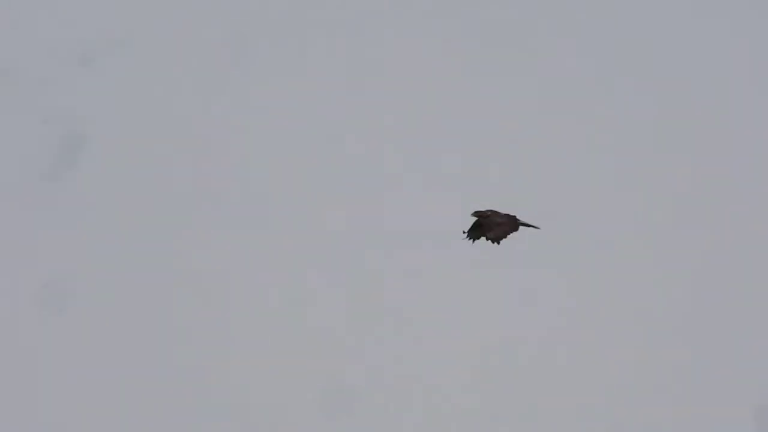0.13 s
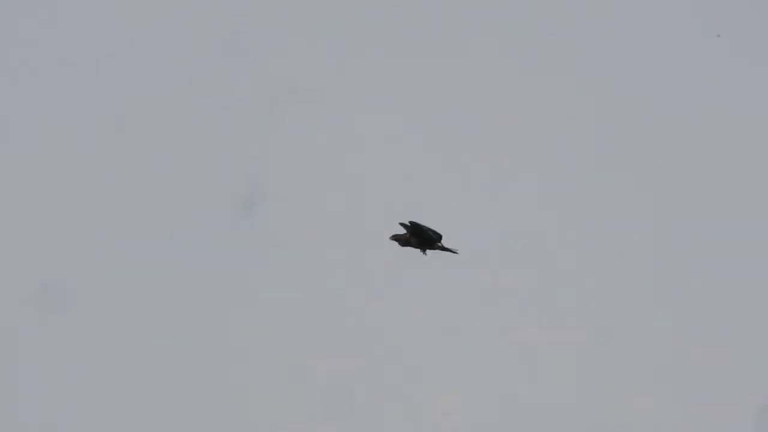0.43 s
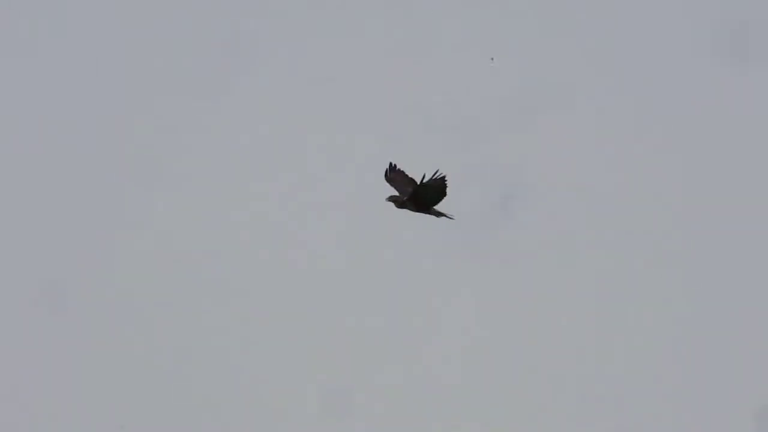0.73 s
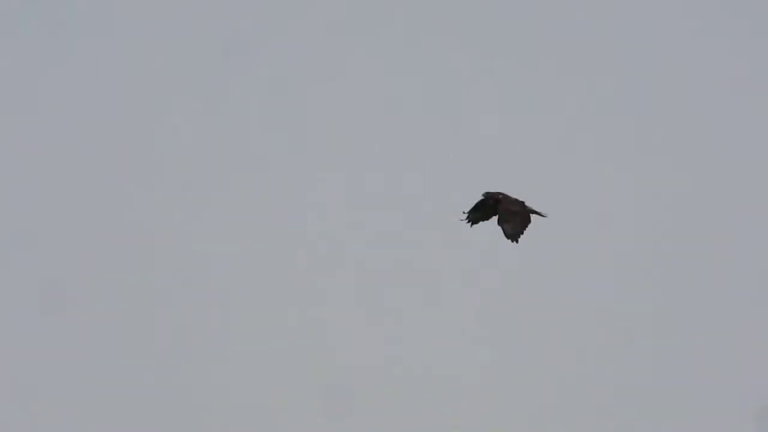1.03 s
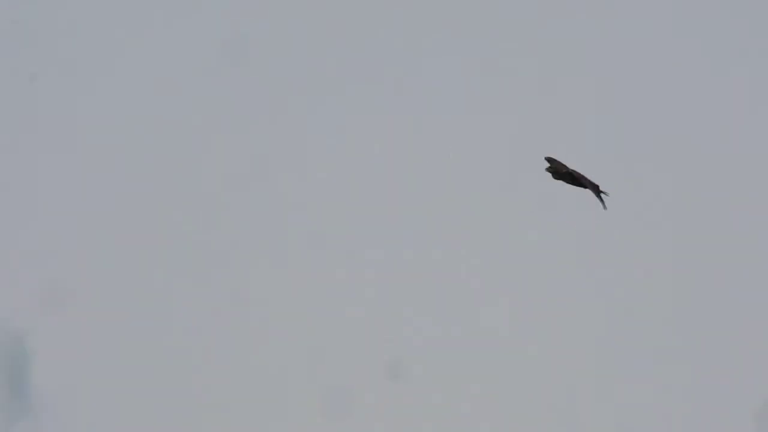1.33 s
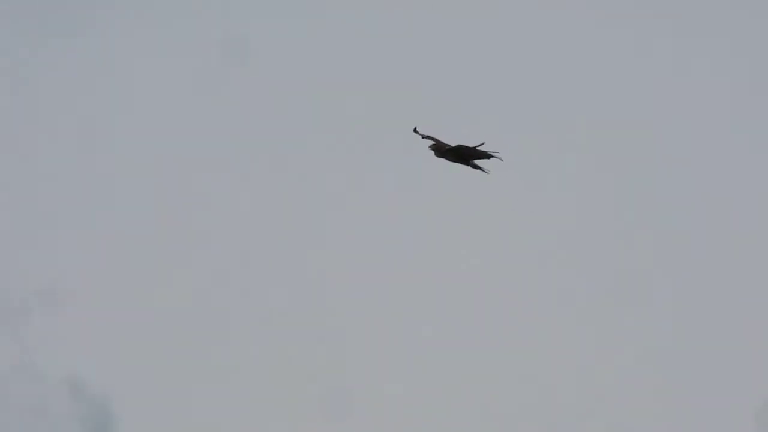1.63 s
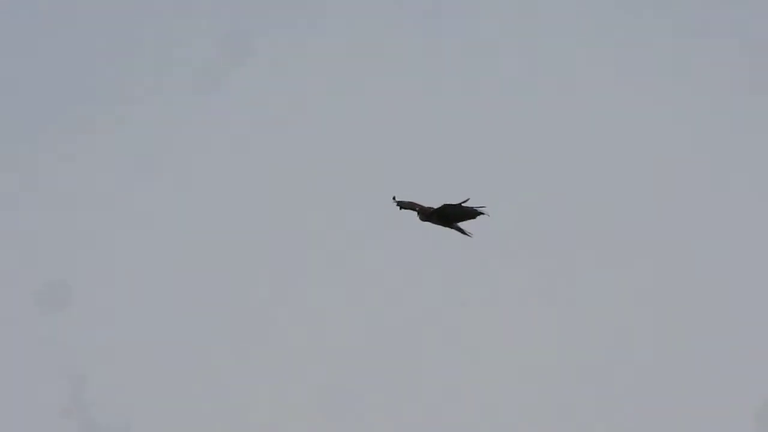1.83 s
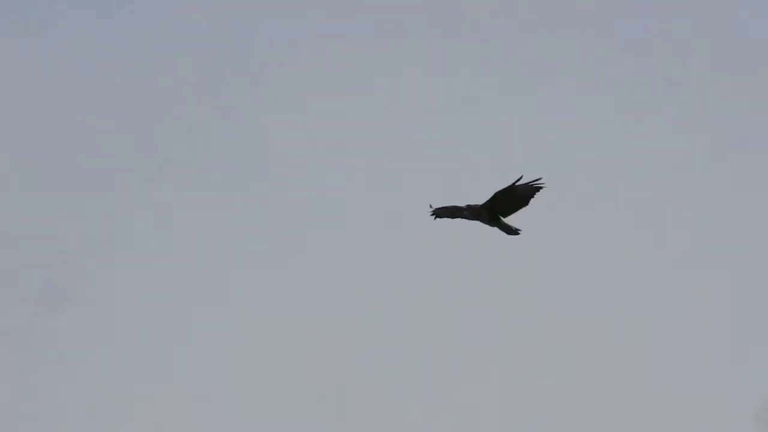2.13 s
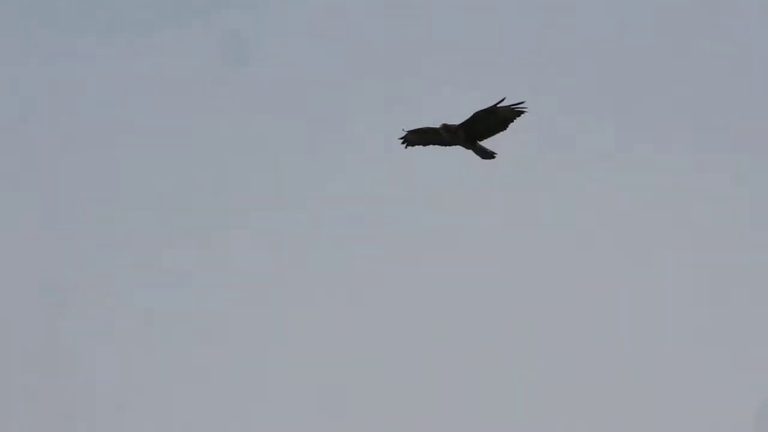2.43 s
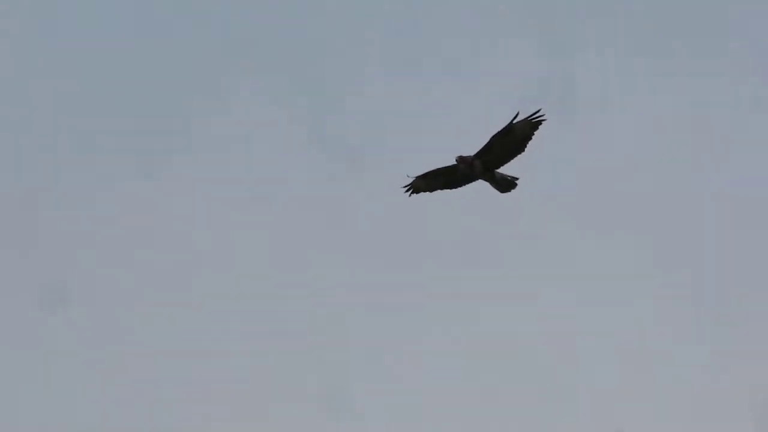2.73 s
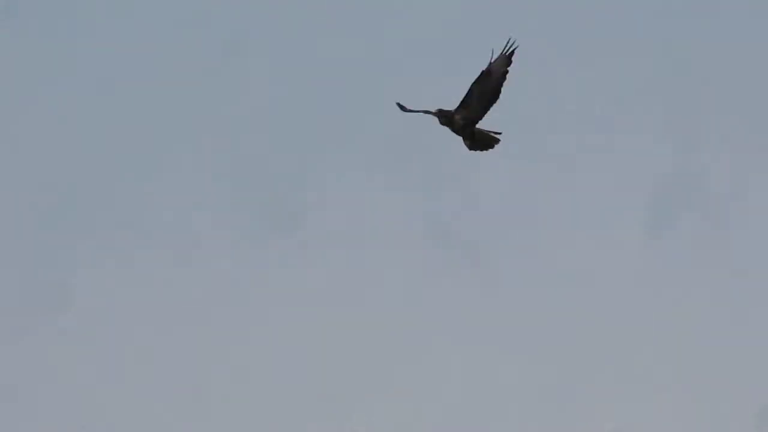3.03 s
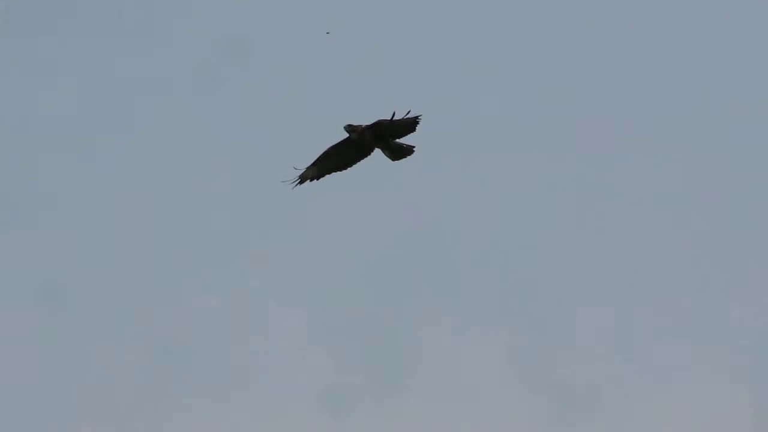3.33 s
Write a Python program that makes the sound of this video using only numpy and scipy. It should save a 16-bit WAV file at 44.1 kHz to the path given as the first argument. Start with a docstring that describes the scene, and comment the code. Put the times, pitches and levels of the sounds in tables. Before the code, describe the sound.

A buzzard overhead gives one short mew that jumps up, rasps briefly and slides down. Distant traffic roars steadily outdoors, and wind gusts thump the microphone before and after the call.

```python
"""Distant traffic roars and rumbles throughout, with an engine throb, faint machine tones and hiss.
Gusts buffet and thump the microphone at the start and ease after 1 s.
At 2 s a buzzard overhead gives one mew, syrinx partials shaped by throat and beak: the pitch climbs,
breaks upward, rasps briefly and slides down, with faint echoes from ground and trees.
From 2.6 s the gusts return."""
import sys
import numpy as np
from scipy import signal
from scipy.fft import rfft, irfft
from scipy.io import wavfile

SR = 44100
rng = np.random.default_rng(int(sys.argv[2]) if len(sys.argv) > 2 else 0)


def wav_out(sig):
    """Save sig, one row per channel (or a flat mono array), as 16-bit PCM at SR to the path in sys.argv[1]."""
    wavfile.write(sys.argv[1], SR, np.round(np.clip(np.atleast_2d(sig).T, -1, 1) * 32767).astype(np.int16))


N = 153027
T = np.arange(N) / SR
HZ = np.fft.rfftfreq(N, 1 / SR).clip(1)


def from_db(db):
    """Decibels to gain."""
    return 10 ** (np.asarray(db) / 20)


def unit_rms(x):
    """Scale to unit power."""
    return x / np.sqrt(np.mean(x ** 2) + 1e-20)


def in_time(rows):
    """Interpolate (seconds, value) rows at every sample."""
    return np.interp(T, *np.transpose(rows))


def at_hz(rows, hz, column=1):
    """Interpolate a table column over log frequency."""
    rows = np.array(rows)
    return np.interp(np.log(hz), np.log(rows[:, 0]), rows[:, column])


def pan(balance_db):
    """Stereo gains; balance is left minus right."""
    return from_db(np.array([[.5], [-.5]]) * balance_db)


def phase_rad(hz):
    """Running phase of a varying frequency."""
    return 2 * np.pi * np.cumsum(hz) / SR


def white_spectra(channels):
    """Spectra of independent white noises."""
    return rfft(rng.standard_normal((channels, N)))


def narrow_band(centre_hz, half_width_hz):
    """Noise band at unit power: a tone that throbs and wanders."""
    band = 1 + ((HZ - centre_hz) / half_width_hz) ** 4
    return unit_rms(irfft(white_spectra(1)[0] / band, N))


def drift(rate_hz):
    """Smooth random signal at unit power."""
    return narrow_band(0, rate_hz)


def noise(spectrum, coherence=0, balance_db=0, left_lead_rad=0):
    """Stereo noise at unit power, coloured by (Hz, dB) rows."""
    mid, side = white_spectra(2)
    alike, sign = np.clip(coherence, 0, 1), np.array([[1], [-1]])
    pair = np.sqrt(1 + alike) * mid + sign * np.sqrt(1 - alike) * side
    rolloff = 1 / (1 + (HZ / (2 * spectrum[-1][0])) ** 4)
    coloured = pair * from_db(at_hz(spectrum, HZ)) * rolloff
    return unit_rms(irfft(coloured * pan(balance_db) * np.exp(.5j * sign * left_lead_rad), N))


def hiss():
    """Fine, nearly steady hiss."""
    # Each row: frequency in Hz, level in dB.
    spectrum = [(2000, -10), (5000, 1.5), (7300, 2), (10000, -1), (13000, -6), (15700, -9.5)]
    # Each row: time in seconds, level in dB.
    level = [(0, -65), (.4, -63), (.75, -62), (1.1, -62.5), (1.7, -63), (3.47, -62.5)]
    return noise(spectrum, coherence=.084, balance_db=1) * from_db(in_time(level))


def drone():
    """Tones of a far machine, wavering in the moving air."""
    # Each row: frequency in Hz, level in dB.
    partials = [(323, -52), (645, -45.5), (965, -84)]
    tones = 0
    for hz, db in partials:
        wavering_hz = hz * (1 + .0062 * drift(rate_hz=10.4))
        tones += from_db(db) * np.sin(phase_rad(wavering_hz))
    return tones * pan(balance_db=1)


def engine():
    """Throb of a far exhaust; a thin whine comes and goes above it."""
    # Each row: time in seconds, level in dB.
    throb_level = [(0, -60), (1.1, -35), (1.58, -40.5), (1.71, -26.5), (1.8, -36), (2.5, -35),
                   (3.47, -35.5)]
    whine_level = [(0, -45.5), (.45, -39), (.85, -45.5), (1.3, -47), (1.7, -43), (2.05, -37.5),
                   (2.6, -44.5), (3.47, -47)]
    throb = narrow_band(centre_hz=120, half_width_hz=24) * from_db(in_time(throb_level))
    whine = narrow_band(centre_hz=1475, half_width_hz=65) * from_db(in_time(whine_level))
    return throb + whine * pan(balance_db=1)


def traffic_rumble():
    """Low rumble of distant engines."""
    # Each row: frequency in Hz, level in dB.
    spectrum = [(30, -12), (70, -5), (95, 2.5), (125, 2), (145, 0), (178, -12.5), (225, -5), (262, -10.5),
                (300, -22), (350, -16), (430, -34.5), (700, -28.5)]
    # Each row: time in seconds, level in dB.
    level = [(0, -38.5), (.6, -32.5), (1.4, -36.5), (2, -30), (2.7, -29.5), (3.47, -34)]
    return noise(spectrum, coherence=1, left_lead_rad=-.12) * from_db(in_time(level))


def tyre_roar():
    """Roar of distant tyres that slowly dulls."""
    # Each row: frequency in Hz, level in dB.
    spectrum = [(300, -5.5), (450, -8), (620, 1.5), (740, -3), (840, -1.5), (980, 2.5), (1100, 0),
                (1250, -1), (1470, 2), (1720, -4.5), (1960, -1.5), (2250, -8.5), (2650, -8), (2900, -14),
                (3300, -13.5), (3750, -24), (4400, -29), (5300, -37.5), (7500, -73)]
    # Each row: frequency in Hz, balance in dB, left lead in radians, coherence.
    stereo = [(400, 0.5, -0.6, 0.94), (650, 0.5, 0.32, 0.98), (1050, 1.4, 0.23, 0.94),
              (1650, 1, -0.07, 0.96), (2120, -2.5, 0.45, 1), (2670, -3.5, 0.63, 0.88), (3100, -5.5, 1.4, 1),
              (3530, 3.5, 1.83, 0.68), (4070, 2, 1.3, 0.55), (5500, 4, 3, 0.46)]
    # Each row: time in seconds, gain in dB.
    level = [(0, -35.5), (.8, -33), (1.5, -32.5), (2.2, -32), (2.8, -33.5), (3.47, -34)]
    treble_gain = [(0, 2.5), (.8, 4), (1.5, 1.9), (2.1, -0.5), (2.7, -1.5), (3.47, 0)]
    crossover_hz = 1710
    balance_db, left_lead_rad, coherence = (at_hz(stereo, HZ, column) for column in (1, 2, 3))
    roar = noise(spectrum, coherence, balance_db, left_lead_rad)
    body = irfft(rfft(roar) / (1 + (HZ / crossover_hz) ** 6), N)
    treble = (roar - body) * from_db(in_time(treble_gain))
    return (body + treble) * from_db(in_time(level))


def wind():
    """Buffeting, separate at each microphone port; finer eddies grow faster with the gust."""
    # Each row: time in seconds, level in dB.
    gusts = [(0, -23), (.07, -22.5), (.18, -25), (.28, -24.5), (.33, -26), (.40, -26.5), (.48, -34),
             (.75, -32), (.98, -30), (1.12, -46), (1.55, -48), (1.78, -40.5), (2.16, -44), (2.42, -43),
             (2.65, -30.5), (2.93, -25), (3.09, -26), (3.26, -30.5), (3.32, -26.5), (3.39, -23.5),
             (3.47, -26.5)]
    # Each row: time in seconds, balance in dB.
    gust_side = [(0, 5.5), (.35, 6.5), (.6, 6), (2.7, 0.5), (3.08, 0.5), (3.32, -3), (3.4, 7), (3.47, -4)]
    # Each row: frequency in Hz, level in dB.
    buffet_spectrum = [(15, -37), (35, 6), (70, 4), (110, -4.5), (170, -4), (280, -27), (500, -45),
                       (1500, -47)]
    eddy_spectrum = [(50, -16), (140, 6), (220, -4.5), (350, -17), (600, -27), (1500, -58)]
    eddy_db, eddy_growth, strong_gust_db = -24.5, 4.4, -24
    gust_db = in_time(gusts)
    eddies = noise(eddy_spectrum) * from_db(eddy_db + eddy_growth * (gust_db - strong_gust_db))
    buffet = noise(buffet_spectrum) * from_db(gust_db)
    flicker_db = 1.06 * drift(rate_hz=21)
    return (buffet + eddies) * pan(in_time(gust_side)) * from_db(flicker_db)


def thumps():
    """Single eddies hit a port: a quick push of pressure, then a dying low flutter."""
    # Each row: start in seconds, peak in dB, pitch in Hz, decay in seconds, balance in dB.
    hits = [(0.053, -20.5, 115, 0.016, 10), (.253, -19, 104, 0.0078, 0), (0.353, -14, 85, .028, 0),
            (2.223, -20, 61.4, 0.02, 6), (2.92, -21.5, 135, 0.034, -15), (3.304, -19, 65.4, 0.043, -14),
            (3.363, -20.5, 66.6, 0.041, 13), (3.446, -18.5, 65.8, 0.029, -12)]
    rise_s, pitch_wander = .0098, .143
    out = 0
    for start_s, db, hz, decay_s, balance_db in hits:
        age_s = np.maximum(T - start_s, 0)
        rise = np.sin(np.pi / 2 * np.minimum(age_s / rise_s, 1)) ** 2
        decay = np.exp(-np.maximum(age_s - rise_s, 0) / decay_s)
        flutter_hz = hz * (1 + pitch_wander * drift(rate_hz=22.6)) * (age_s > 0)
        out += from_db(db) * rise * decay * np.sin(phase_rad(flutter_hz)) * pan(balance_db)
    return out


def echoes(source):
    """Dull, diffuse reflections from ground and trees."""
    # Each row: frequency in Hz, level in dB.
    spectrum = [(1000, -8), (3000, -6), (5000, 0), (9000, -18)]
    echo_db, rt60_s, rise_s = -14, .36, .01
    tail = noise(spectrum) * from_db(-60 * T / rt60_s) * np.clip(T / rise_s, 0, 1)
    tail /= np.sqrt(np.mean(np.abs(rfft(tail)[:, HZ < 4000]) ** 2))   # unit mean power gain below 4 kHz
    return from_db(echo_db) * signal.fftconvolve(source, tail, axes=1)[:, :N]


def syrinx(pitch_hz):
    """Eight partials slide through the fixed resonances of throat and open beak."""
    # Each row: frequency in Hz, gain in dB.
    throat = [(1000, -11), (1450, -23), (2050, -4), (2300, 1.5), (2520, 0.5), (3050, -14), (3250, -10),
              (3580, -11), (3900, -13.5), (4350, -15), (4750, -15), (5020, -21), (5300, -13.5), (5600, -23),
              (5880, -21.5), (6150, -39), (6800, -24), (7280, -30.5), (7700, -34), (8400, -23), (9400, -37),
              (10500, -44)]
    # Each row: frequency in Hz, balance in dB.
    balance = [(2000, -1), (2800, -4), (3500, 0), (4300, 4.5), (5300, 4), (5900, 4), (8000, -3)]
    # Each row: time in seconds, gain from the third partial up in dB.
    overtones = [(2.02, 3), (2.036, 7), (2.052, -6), (2.064, 0.5), (2.085, 0.5), (2.105, 1), (2.125, -8),
                 (2.148, 2.5), (2.17, -0.5), (2.198, -5), (2.24, -2.2), (2.29, -0.5), (2.33, 0.5),
                 (2.36, -5.5), (2.38, 0.5)]
    upper_loss_db, top_loss_db = 3.5, 14
    phase, overtones_db = phase_rad(pitch_hz), in_time(overtones)
    voice = 0
    for k in range(1, 9):
        source_db = overtones_db * (k >= 3) - upper_loss_db * (k >= 4) - top_loss_db * (k >= 6)
        gain = from_db(source_db + at_hz(throat, k * pitch_hz))
        voice += np.sqrt(2) * np.sin(k * phase) * gain * pan(at_hz(balance, k * pitch_hz))
    return voice


def buzzard():
    """One mew; in each rasp a fast trill shakes the pitch and air hisses."""
    # Each row: time in seconds, pitch in Hz.
    pitch = [(2.024, 1138), (2.04, 1200), (2.058, 1305), (2.063, 1495), (2.068, 1440), (2.086, 1424),
             (2.089, 1474), (2.105, 1440), (2.12, 1380), (2.15, 1342), (2.188, 1272), (2.2, 1205),
             (2.22, 1168), (2.255, 1145), (2.30, 1072), (2.37, 1037), (2.4, 992)]
    # Each row: time in seconds, level in dB.
    effort = [(2.022, -31), (2.034, -40.5), (2.05, -31), (2.06, -33), (2.07, -30), (2.11, -27.5),
              (2.15, -36), (2.195, -37.5), (2.30, -37), (2.335, -42), (2.36, -34), (2.375, -42),
              (2.398, -46)]
    # Onset, upward break, early slide. Each row: centre in seconds, half length in seconds, roughness.
    rasps = [(2.024, .009, .6), (2.061, .007, .6), (2.152, .021, .9), (2.183, .011, .35)]
    # Each row: frequency in Hz, level in dB.
    air_spectrum = [(1500, -15), (2600, -2), (4200, -8), (6000, 2), (9300, -6), (11500, -30)]
    start_s, attack_s, end_s, release_s = 2.021, .010, 2.404, .02
    trill_hz, jitter_hz = 160, 400
    flutter_depth, trill_depth, jitter_depth = .0052, .07, .014   # fractions of the pitch
    air_db, rasp_air_db = -42, -24
    shimmer_db, rasp_shimmer_db = .9, 2.3

    rasp = sum(rough * np.exp(-((T - centre_s) / half_s) ** 4) for centre_s, half_s, rough in rasps)
    trill = np.sin(phase_rad(trill_hz * (1 + .078 * drift(rate_hz=41))))
    flutter = flutter_depth * drift(trill_hz)
    shake = rasp * (trill_depth * trill + jitter_depth * drift(jitter_hz))
    voice = syrinx(in_time(pitch) * (1 + flutter + shake))
    air_gain = from_db(air_db) + from_db(rasp_air_db) * rasp ** 2 * (1 + .3 * trill)
    air = noise(air_spectrum, coherence=.6) * air_gain
    gate = np.clip((T - start_s) / attack_s, 0, 1) * np.clip((end_s - T) / release_s, 0, 1)
    level_db = in_time(effort) + (shimmer_db + rasp_shimmer_db * rasp) * drift(jitter_hz)
    return (voice + air) * gate * from_db(level_db)


def scene():
    """The bird over wind, traffic and hiss."""
    mew = buzzard()
    foreground = mew + echoes(mew) + wind() + thumps()
    return foreground + traffic_rumble() + tyre_roar() + engine() + drone() + hiss()


def record(dry):
    """Steep elliptic low-pass."""
    cutoff_hz = 15700
    return signal.sosfilt(signal.ellip(12, .1, 80, cutoff_hz, fs=SR, output="sos"), dry)


dry = scene()
out = record(dry)
wav_out(out)
```